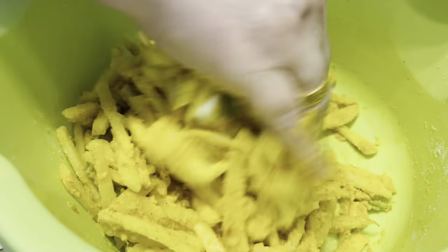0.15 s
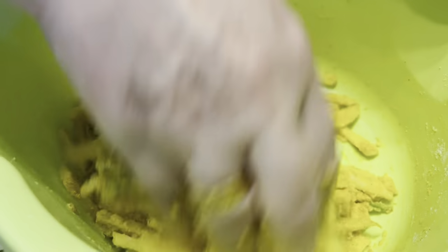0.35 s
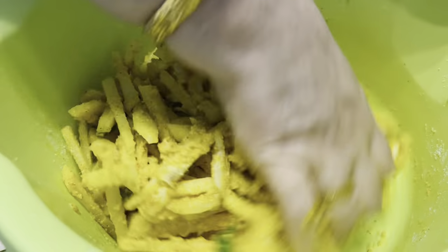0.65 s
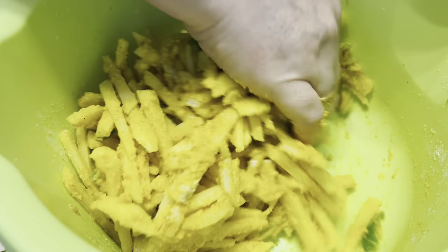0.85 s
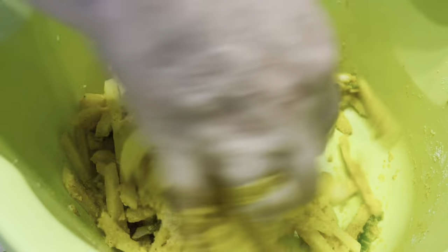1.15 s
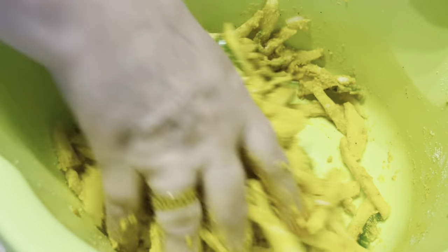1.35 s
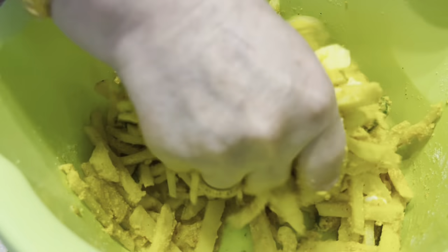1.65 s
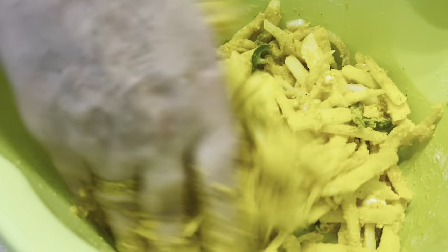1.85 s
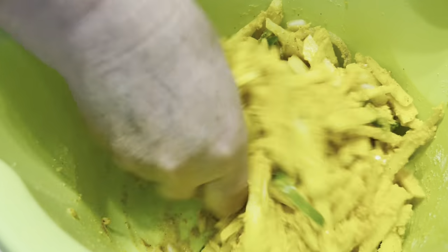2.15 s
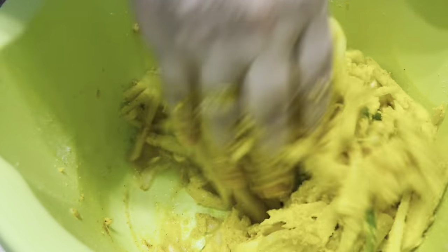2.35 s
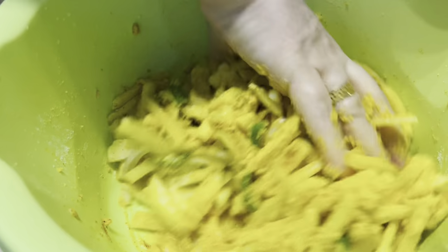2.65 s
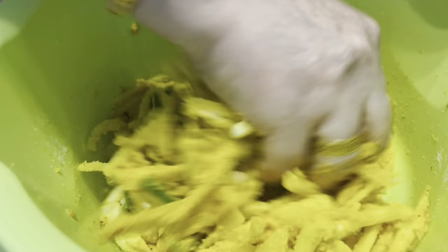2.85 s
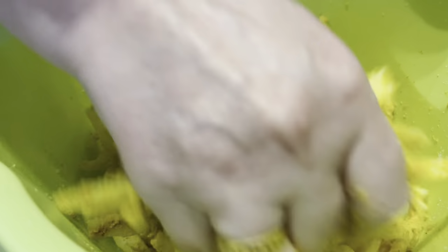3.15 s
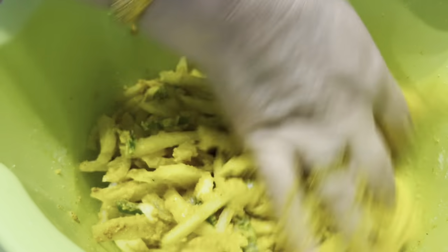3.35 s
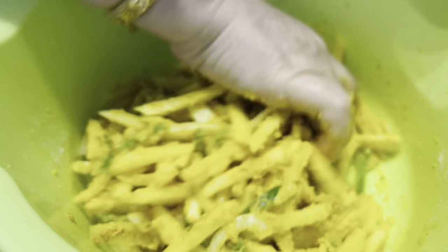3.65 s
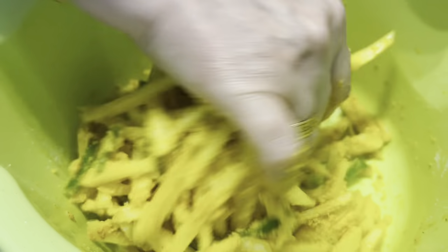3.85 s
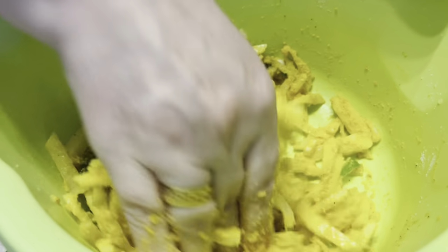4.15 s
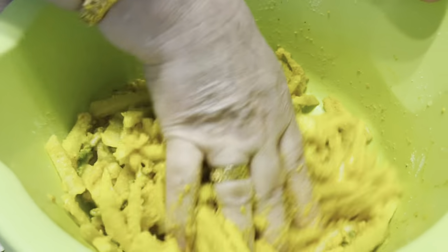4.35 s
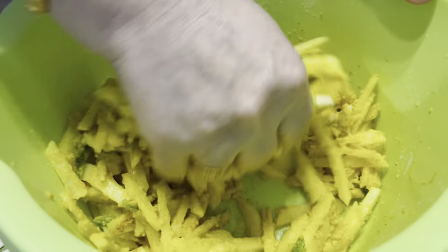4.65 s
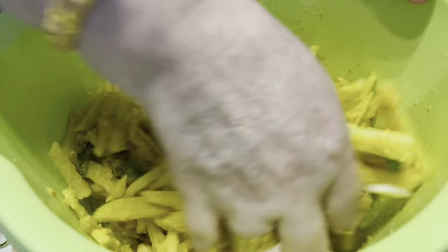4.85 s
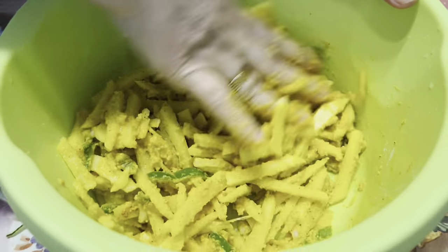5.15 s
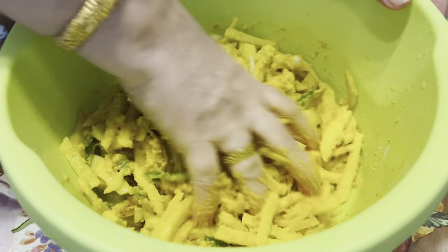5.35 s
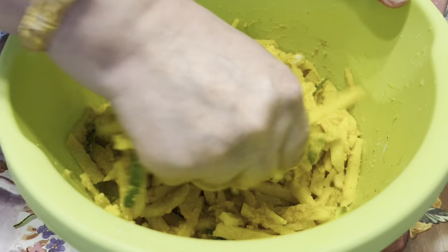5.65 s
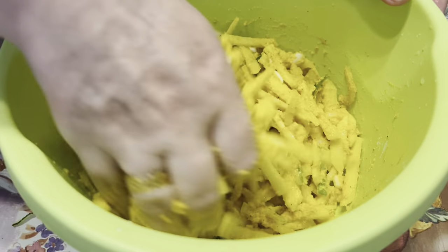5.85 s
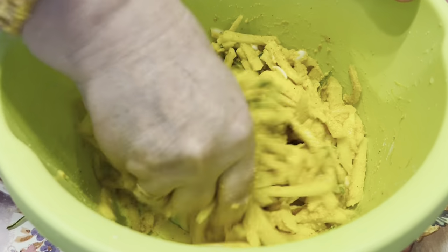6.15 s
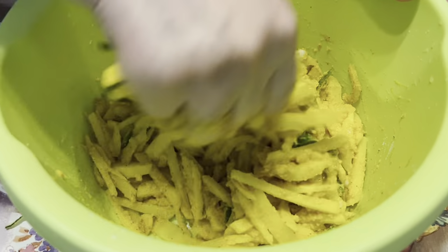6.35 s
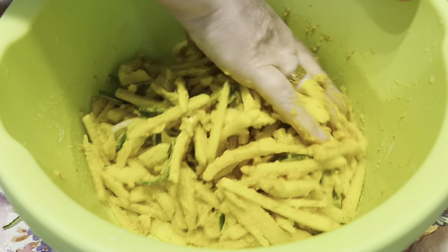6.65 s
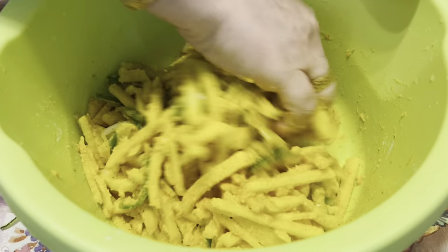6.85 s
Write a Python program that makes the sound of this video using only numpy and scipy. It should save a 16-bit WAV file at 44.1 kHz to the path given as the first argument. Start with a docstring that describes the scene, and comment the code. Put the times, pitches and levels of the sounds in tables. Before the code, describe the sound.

Close stereo sound of a hand mixing moist, coated vegetable strips in a plastic bowl. Short strokes of wet crackle, fine hiss and rubbing come in uneven bursts, while fingers and a ring knock the wall. The hardest hollow knocks fall just after two seconds, near 2.6 and near 3.6. Low table rumble and quiet kitchen air lie behind.

```python
"""A bare hand squeezes and turns damp vegetable strips in a plastic bowl, close to a stereo microphone.
Rubbing strips set the wall ringing, tearing ones crackle in dense wet grains, and a fine hiss lies on top.
Fingers and ring knock on the bowl: each knock is a set of short fading tones plus a bright crack.
Behind it, shaped noise makes the rumble and air of the kitchen, and a low sine hum swells for a while."""
import sys
import numpy as np
from scipy import signal
from scipy.fft import rfft, irfft, next_fast_len
from scipy.io import wavfile

SR = 44100
rng = np.random.default_rng(int(sys.argv[2]) if len(sys.argv) > 2 else 0)


def to_wav(s):
    """Save 16-bit WAV."""
    ch = np.atleast_2d(s).T  # columns
    pcm = np.round(np.clip(ch, -1, 1) * 32767)  # PCM
    wavfile.write(sys.argv[1], SR, pcm.astype(np.int16))


N = 308259   # length in samples, about 7 s


def from_db(db):
    """Turn decibels into a gain."""
    return 10 ** (np.asarray(db) / 20)


def rms_one(x):
    """Scale to an average strength (rms) of 1."""
    return x / np.sqrt(np.mean(x ** 2) + 1e-20)


def at_hz(points, hz):
    """Read a curve of (f/Hz, value) points, joined by straight lines over log frequency."""
    points_hz, values = np.array(points).T[:2]
    return np.interp(np.log(hz), np.log(points_hz), values)


def drift(rate_hz):
    """Slow random wandering of spread 1: noise smoothed twice at one value per 40 samples."""
    r = np.exp(-80 * np.pi * rate_hz / SR)
    noise = rng.standard_normal(N // 40 + 2002)
    slow = signal.lfilter([1], [1, -2 * r, r * r], noise)[2000:]   # drop the filter's start-up
    return np.interp(np.arange(N) / 40, np.arange(len(slow)), rms_one(slow))


def ring(clicks, hz, t60):
    """Each unit click starts a sine of height 1 that falls 60 dB in t60 seconds."""
    r, w = from_db(-60 / (t60 * SR)), 2 * np.pi * hz / SR
    return signal.lfilter([0, np.sin(w)], [1, -2 * r * np.cos(w), r * r], clicks + 1e-18)


def grains(per_s, spread_db, clump_db):
    """Two unrelated streams of clicks, a few large among many small, that come in clumps."""
    chance = per_s * from_db(clump_db * drift(25)) / SR
    born = rng.random((2, N)) < chance
    size_db = spread_db * np.minimum(rng.exponential(1, born.sum()), 5)
    out = np.zeros((2, N))
    out[born] = from_db(size_db) * rng.standard_normal(born.sum())
    return out


# how alike left and right are: (f/Hz, likeness 0-1)
ALIKE = [(60, 1), (120, 0.81), (240, 0.9), (480, 0.62), (950, 0.12), (1900, 0.52), (3800, 0.38),
         (7500, 0.84), (15000, 0.81)]


def coloured(pair, spectrum):
    """A shared and an opposed stream make left and right more or less alike, then get a spectrum."""
    size = next_fast_len(N)
    hz = np.maximum(np.fft.rfftfreq(size, 1 / SR), 1)
    curve = [(spectrum[0][0] / 2, -80)] + list(spectrum)   # fade out below the lowest point
    gain = from_db(at_hz(curve, hz)) * (hz < 1.02 * spectrum[-1][0])
    alike = np.clip(at_hz(ALIKE, hz), 0, 1)
    mid, side = rfft(pair, size) * gain
    both = np.sqrt(1 + alike) * mid + np.sqrt(1 - alike) * side * [[1], [-1]]
    return irfft(both, size)[:, :N]


def swells(rows):
    """Gestures rise, hold and fall, and add in power: one dB curve for each level column."""
    t, power = np.arange(0, N, 32) / SR, 1e-12
    for s, rise, hold, fall, *levels_db in rows:
        rising = (t - s) / max(rise, .002)
        falling = (s + hold - t) / max(fall, .08)
        shape_db = 20 * np.minimum(0, np.minimum(rising, falling))
        power = power + from_db(np.add.outer(levels_db, shape_db)) ** 2
    return np.array([np.interp(np.arange(N) / SR, t, 10 * np.log10(p)) for p in power])


def laid(s, pieces):
    """Place short stereo pieces at their times."""
    out = np.zeros((2, N + pieces.shape[2]))
    for i, piece in zip(np.round(s * SR).astype(int), pieces.transpose(1, 0, 2)):
        out[:, i:i + piece.shape[1]] += piece
    return out[:, :N]


# swells of the hum: (t at full level/s, 20 dB rise/s, at least .002, hold/s, 20 dB fall/s, at least .08,
# level/dB)
HUM_SWELLS = [(1.0, 2.5, 0.3, 2, -64), (1.45, 0.4, 0.39, -1.5, -55.5), (2.55, 0.5, 0.73, 0.5, -45.5),
              (3.25, 0, 0.19, 0, -51.5)]
HUM_HZ, HUM_SAG_HZ_PER_S = 68.2, 1.8   # starting pitch, and how fast it sinks


def hum():
    """A pure tone sinks slowly in pitch, with a slight random wobble, while its level swells and fades."""
    t = np.arange(N) / SR
    level = np.sqrt(2) * from_db(swells(HUM_SWELLS)[0])
    phase = 2 * np.pi * (HUM_HZ - HUM_SAG_HZ_PER_S * t / 2) * t + .12 * drift(1.5)
    return level * np.sin(phase)


# colours of the rumble, the deepest rumble and the still air: (f/Hz, relative level/dB per Hz)
RUMBLE_COLOUR = [(70, -5.5), (90, 5), (130, 0.5), (200, -11.5), (300, -8.5), (400, -13)]
DEEP_COLOUR = [(30, -28), (40, -9.5), (52, 7.5), (65, 8), (80, -16.5)]
AIR_COLOUR = [(120, -19), (200, 12.5), (296, -9), (405, -2.5), (1010, 8), (1270, -13), (2500, -12),
              (5230, -31), (8500, 0.5), (11000, -50), (18700, -120)]
# the bowl is shoved on the table and shakes it: (t/s, rumble level/dB, deepest rumble level/dB)
TABLE_SHOVES = [(.04, -73, -66), (.33, -59, -66), (.72, -61, -54), (.88, -71, -65), (1.42, -48.5, -47),
                (2.02, -48.5, -63.5), (2.65, -53, -65.5), (3.3, -54.5, -59.5), (3.66, -58, -51),
                (3.83, -93.5, -63), (4.17, -50, -48), (4.3, -54.5, -54), (4.44, -71.5, -54),
                (4.54, -54.5, -60), (4.87, -57.5, -51.5), (5.06, -63.5, -63.5), (5.22, -72, -49.5),
                (5.489, -57.5, -58), (5.63, -82, -57), (6.009, -60.5, -57), (6.601, -63.5, -51)]
SHOVE_RISE_S, SHOVE_HOLD_S, SHOVE_FALL_S = 0.18, 0.026, 0.14   # rise and fall are over 20 dB
RUMBLE_DB, DEEP_DB, SWAY_DB = -62, -63, 3.5   # steady levels, and the size of their random sway
AIR_DB = -67


def kitchen():
    """Low hum, swaying rumble and still air, all but the hum from noise; shoves make the table rumble."""
    low_hum = hum()
    steady = [(0, 1, N / SR, 1, RUMBLE_DB, DEEP_DB)]
    shoves = [(s, SHOVE_RISE_S, SHOVE_HOLD_S, SHOVE_FALL_S, *levels_db) for s, *levels_db in TABLE_SHOVES]
    rumble_db, deep_db = swells(steady + shoves)
    rumble, deep, air = (rms_one(coloured(rng.standard_normal((2, N)), colour))
                         for colour in (RUMBLE_COLOUR, DEEP_COLOUR, AIR_COLOUR))
    rumble = from_db(rumble_db + SWAY_DB * drift(22.0)) * rumble
    deep = from_db(deep_db + SWAY_DB * drift(6.9)) * deep
    return low_hum + rumble + deep + from_db(AIR_DB) * air


# knocks and snaps on the bowl: (t/s, base level/dB, then level/dB against it and centre f/Hz for the thud
# of the low modes, the tick of the middle modes and the snap of the top modes; crack level/dB against base
# and its pitch f/Hz, top crack level/dB against base, left over right level/dB, ring length factor,
# pitched share of the crack 0-1)
BOWL_KNOCKS = [(0.012, -33.5, -6.5, 464, -7, 790, -15, 2000, -18, 4000, -30, 0, 1, 0.6),
               (0.094, -37, -11, 298, -14, 770, -16, 2260.0, -5, 4760, -17, 7, 0.69, 0.6),
               (0.3017, -32, -9, 510, -32, 754.0, -35.0, 1890.0, -38, 5090.0, -19, 2, 0.9, 0.65),
               (0.333, -34, -7, 305, -16.5, 1050, -21, 1880.0, -34.5, 6630.0, -28.0, -3.5, 1.05, 0.65),
               (0.3618, -27, -14.5, 365, -14, 1110, -3, 2530, -11, 3260, -19, 4, 1.1, 0.65),
               (0.5151, -32, -19, 550.0, -14.5, 1250, -11, 2200.0, -10, 4330.0, -13, 5, 0.75, 0.65),
               (0.853, -36, -8, 500.0, -27, 805.0, -20, 2440.0, -21.0, 3310.0, -14, 3, 0.73, 0.65),
               (0.9602, -29.5, -43, 320, -37, 870, -8.5, 2400, -10.5, 4310.0, -17, -1, 1, 0.4),
               (1.105, -38, -9, 458, -44, 740, -27, 2070, -21.5, 8100, -36, 6, 1, 0.65),
               (1.133, -43, -6, 510.0, -39, 864.0, -23.0, 2470.0, -23.5, 7990.0, -34.0, 5, 1.2, 0.65),
               (1.199, -40.5, -10, 300.0, -9.5, 1010, -5.5, 2150, -26.0, 3310.0, -24.0, 5, 1.1, 0.65),
               (1.22, -38, -24, 610, -22, 1050, -1.5, 2480, 1, 4250, -5.5, 5, 0.72, 0.4),
               (1.3928, -30.5, -17, 610.0, -11.5, 940, -19, 2450.0, -4.5, 7560, -27.5, 4, 1.3, 0.7),
               (1.507, -35.5, -6, 516, -23, 1420, -25, 2380.0, -5, 3500, -9, 3, 1, 0.6),
               (1.7274, -32.5, -13.5, 480.0, -17, 770, -8, 1980, -12, 4030, -15, 4, 0.95, 0.3),
               (1.808, -43.5, -14, 300.0, -17, 982.0, -2, 3270.0, -12, 4410.0, -28.0, -1.5, 0.9, 0.65),
               (1.824, -34.5, -29, 620.0, -16, 1140, -7, 1760, -12, 3490.0, -26.5, 4, 1, 0.65),
               (1.876, -45, -2, 520.0, -32.5, 999.0, -28, 1810.0, -30, 5460.0, -30, 1, 1.1, 0.65),
               (1.892, -43, -4, 560.0, -29, 910.0, -18, 3140.0, -23.0, 3500.0, -9, 6.0, 0.72, 0.65),
               (1.9065, -26.5, -14, 600.0, -15.5, 990, -6, 2820, -6, 3500, -27, 4.5, 1.2, 0.7),
               (2.0149, -12, -22, 650.0, -13.5, 840, -8, 2175, -5, 4590, -9, 6, 0.95, 0.5),
               (2.1081, -23.5, -11, 540.0, -12.5, 990, -25, 2530.0, -27.5, 4390.0, -32, -0.5, 0.77, 0.65),
               (2.117, -23, -11, 550.0, -6.5, 960, -16, 2510.0, -15, 3340, -22, -12, 1, 0.9),
               (2.1258, -16, -12, 560.0, -7, 920, -5.5, 2665, -9.5, 4400, -13, 6.5, 0.93, 0.54),
               (2.134, -26.5, -10.5, 560, -6, 930, -20, 2500, -30, 4000, -40, 1, 1.1, 0.6),
               (2.3014, -32, -9, 470, -46, 937.0, -36, 2440.0, -42.0, 3780.0, -48.0, 8, 0.91, 0.65),
               (2.323, -36.5, -13, 517, -20, 1120.0, -5.5, 2290, -11.5, 3570, -41, 0, 1.2, 0.8),
               (2.382, -41, -9, 383, -28, 810.0, -12, 1860, -24, 5010.0, -31, 0.0, 1, 0.65),
               (2.397, -34, -9.5, 517, -44, 818.0, -13, 2370, -19.5, 7910.0, -39.0, 4, 0.86, 0.65),
               (2.419, -40.5, -1, 440.0, -12.5, 1090.0, -8, 2036, -34.0, 7760.0, -36.0, -1.5, 1.1, 0.65),
               (2.449, -32, -11.5, 560.0, -10.5, 1080, -16, 1970.0, -38.5, 3530.0, -43, 6.5, 1.2, 0.65),
               (2.458, -31, -9.5, 580.0, -6, 931.0, 0, 2500.0, -3.5, 5020, -34.0, 1.5, 1, 0.6),
               (2.4652, -22, -10, 408, -8.5, 1780, -12.5, 1800, -27, 3310.0, -44.5, 1.5, 1, 0.65),
               (2.4736, -20, -10.5, 457, -23.5, 1050.0, -43.5, 1810.0, -46, 3410.0, -47, 4.5, 1.5, 0.65),
               (2.483, -24.5, -9, 510.0, -13, 1070, -10, 2010.0, -36.5, 3660.0, -42, -6, 0.91, 0.65),
               (2.6497, -13, -15.5, 500, -7.5, 890, -8, 1310, -23, 3450.0, -23, 1, 0.99, 0.5),
               (2.684, -17.5, -9.5, 510.0, -11, 940, -11.5, 1790, -34, 3980.0, -40, 0.5, 1.45, 0.65),
               (2.705, -30.5, -19, 600, -7, 905, -18, 2000, -30, 4000, -40, 2, 0.9, 0.65),
               (2.7263, -24.5, -12.5, 480.0, -22, 802.0, -15, 2260.0, -24.5, 4190.0, -35.0, 4, 1, 0.65),
               (2.939, -52, -14.0, 294, -23, 876, -17, 3270.0, 7.5, 3310.0, -25.5, -9, 0.73, 0.75),
               (2.985, -47.5, -7.5, 300.0, -22, 750.0, -3.0, 3000, 3.5, 3820, -6, 0, 0.9, 0.65),
               (3.0839, -31, -20.5, 545, -11, 1100.0, -13, 1940.0, -15, 3630, -23, 6, 1.4, 0.9),
               (3.1661, -23, -13.5, 290, -14, 1650, -9.5, 2660, -18, 3860, -31, 4, 0.93, 0.8),
               (3.175, -34, -26, 500, -11, 1580, -8, 2300, -16, 3300, -41, 3, 1.3, 0.65),
               (3.182, -32, -6.5, 338, -19, 990, -16, 2190.0, -33, 3590.0, -29, 6, 0.8, 0.65),
               (3.2017, -28, -21, 450.0, -28, 1720.0, -6, 2520, -7.5, 3450, -21.0, 2, 1.1, 0.54),
               (3.234, -41, -30, 520.0, -8, 1000.0, -11, 1810.0, -22, 3460.0, -28, -4.5, 1, 0.6),
               (3.2842, -30.5, -29, 300.0, -12.5, 1120, -22, 2510.0, -10, 3750.0, -11, -0.5, 1.3, 0.65),
               (3.372, -19.5, -11, 497, -10.5, 1450.0, -26, 2170.0, -30.5, 7900, -17, 4.5, 1.16, 0.65),
               (3.4023, -28, -15, 650.0, -14.5, 835, -12, 2380, -24, 4130, -25.5, 9, 0.86, 0.65),
               (3.553, -16, -16, 520.0, -11, 800, -30, 1783, -13, 6240, -35, -1, 1.1, 0.4),
               (3.6218, -13.5, -9, 560, -5.5, 1190, -8, 2800, -9.5, 4500.0, -11.5, 1.5, 0.69, 0.46),
               (3.98, -40, -8.5, 480.0, -29, 1160.0, -23, 2800.0, -22, 3350.0, -17, 0.5, 0.9, 0.65),
               (3.99, -40, -7, 500.0, -9.5, 1640.0, -23, 2050.0, -24, 4910.0, -30, 3, 1.1, 0.65),
               (4.0069, -28, -13, 540.0, -20, 1070, -10.5, 2350, -13.5, 3890.0, -18, 2, 1.3, 0.4),
               (4.029, -28.5, -13, 527, -16, 1120, -5.5, 1780, -40, 4010.0, -39.0, 5, 1.3, 0.65),
               (4.172, -35, -16.5, 510.0, -14, 1040, -16, 2830.0, -9, 3870.0, -19, 4, 1.1, 0.65),
               (4.437, -24.5, -11.5, 520, -12, 1060, -17, 3000, -16.5, 3320, -39, 1, 1.6, 0.65),
               (4.4423, -16, -22.5, 530.0, -11, 1760, -11.5, 1810.0, -5, 3300, -31.0, -0.5, 1.5, 0.3),
               (4.4577, -29.5, -8, 570.0, -18, 1500.0, -14, 1960.0, -16, 7850.0, -16, 3, 1, 0.65),
               (4.548, -34, -13.5, 572, -32, 888.0, 0, 2180, -6, 7900.0, -12, 2.5, 1.3, 0.65),
               (4.688, -57.5, -22.5, 510.0, -28, 1030.0, -10.5, 2550.0, 21, 4520, -7.0, 0, 0.9, 0.65),
               (4.743, -42, -24, 337, -26, 1570.0, 1, 2340, -6, 7000, -29.5, 2, 1.3, 0.5),
               (4.7642, -36, -11.5, 546, -25, 744, -7, 2070.0, -10, 6000, -13.5, 2.5, 1.3, 0.5),
               (4.8056, -20.5, -20, 484, -6.5, 1450, -19, 1850, -21, 3280, -28, 4, 1.25, 0.8),
               (4.845, -34.5, -8.5, 537, -13, 1570.0, -35, 1810.0, -31, 3530.0, -21, 5.5, 1.3, 0.65),
               (4.8992, -26.5, -5, 437, -39, 864.0, -35, 3100.0, -31, 3310.0, -38, -1, 1.3, 0.65),
               (4.967, -34.5, -7.5, 310.0, -14, 1710.0, -11, 2030.0, -4, 4390.0, -30, 4, 0.55, 0.6),
               (4.9868, -20, -9, 506, -21, 930, -14, 1900, -16, 4730, -25, 5, 1.07, 0.6),
               (5.048, -35, -13, 470.0, -7, 1610, -19, 2300.0, -2, 5560, -13, 2.5, 1.2, 0.5),
               (5.283, -22.5, -7.5, 554, -28, 980, -26.5, 2130.0, -26.5, 3310.0, -32, -2.5, 0.4, 0.6),
               (5.3119, -24, -9, 527, -11, 950, -29, 1880, -27, 3780.0, -37, -5, 0.81, 0.65),
               (5.3563, -27.5, -27, 590.0, -14, 975, -9, 1810.0, -7.5, 3860, -11, 0.0, 0.77, 0.4),
               (5.373, -33.5, -15, 590.0, -11, 939.0, -15, 2450.0, 1, 3820.0, -21.0, 0.5, 0.9, 0.65),
               (5.422, -36.5, -6.5, 520.0, -15.0, 888.0, -25, 2630.0, -28.0, 7560.0, -21, -2, 0.86, 0.65),
               (5.4845, -32.5, -14.5, 530.0, -15, 1610, -11, 2090.0, -4.5, 3280, -13, 2, 1, 0.5),
               (5.606, -50, -23, 300.0, -30, 760, -14, 2670.0, 10, 8100, -20, -2, 0.76, 0.3),
               (5.669, -55, -15, 300.0, -14, 861.0, -10, 2960.0, 11.5, 7650, 7.5, 13, 0.9, 0.9),
               (5.683, -50, -24, 500, -21, 900, -10, 3000, 11.5, 4300, -11, 3, 0.75, 0.6),
               (5.691, -52, -24, 650.0, -14.5, 1020, -15.0, 3010.0, 13.5, 7560, 8.5, 5.0, 0.83, 0.65),
               (5.746, -35.5, -39, 380.0, -36.0, 1760.0, -3, 2730, -16, 3560, -27.0, 6, 1.1, 0.7),
               (5.774, -47, -28, 500, -26, 1700, -3, 2210, 2, 3500, -20, 1, 0.9, 0.65),
               (5.783, -46, -28, 500, -24, 1710, -3, 2600, -8, 3500, -20, 7, 1, 0.65),
               (5.796, -49, -4.5, 480.0, -20, 740.0, -7, 3000.0, -8, 3700.0, -20, 4, 0.9, 0.65),
               (5.8241, -30.5, -22.5, 540.0, -11.5, 1060, -6, 2080, -36.0, 3320.0, -38, 6, 1.1, 0.65),
               (5.892, -44.5, -12, 300.0, -11, 1010, 1, 3000, -21.0, 3310.0, -29, 2, 0.96, 0.65),
               (5.927, -41.5, -15, 450.0, -7, 1120, -13, 2060.0, 1, 3450, -24.0, -1, 1.1, 0.65),
               (6.436, -51, -23, 292, -12, 830, -22, 3070.0, 4.5, 7900, 8, 0, 0.9, 0.8),
               (6.5213, -24.5, -25, 650.0, -17, 1450, -7.5, 2240, -22, 3310.0, -27, -6, 1.6, 0.6),
               (6.5298, -30, -11, 460.0, -7.5, 1580.0, -20, 2280.0, -15, 3630, -34.0, 6, 1.2, 0.65),
               (6.5406, -25, -5.5, 440.0, -21, 1590.0, -29, 2470.0, -25, 3930.0, -33, 4, 0.5, 0.65),
               (6.5715, -26.5, -13, 500.0, -6.5, 1540, -11, 2190.0, -20, 7470.0, -22, 3, 1.4, 0.65),
               (6.6448, -30.5, -24, 540.0, -8, 1000.0, -30, 2540.0, -28.0, 3570, -36.0, 5, 1.3, 0.65),
               (6.6614, -30.5, -17, 550.0, -9, 970.0, -31.0, 2010.0, -14, 3500, -30, 2, 1, 0.65),
               (6.727, -28, -31, 550.0, -14, 1780.0, -8, 1840, 0, 4300.0, -28.0, -6, 0.84, 0.5),
               (6.733, -26, -20, 480.0, -9, 1770, -19, 2910.0, -7, 3620, -34.0, -1, 1, 0.3),
               (6.78, -38, -21, 580.0, -6.5, 996.0, -15, 1990.0, -22.0, 5700, -22.0, 0, 1.3, 0.65),
               (6.8208, -34.5, -27, 590, -8.5, 930, -7, 1810.0, -14, 3450.0, -23, 3, 1.1, 0.65),
               (6.859, -40.5, -13, 433, -14, 923, -17, 2310.0, 3, 6400, 5, -1, 0.9, 0.65),
               (6.937, -43.5, -11, 530.0, -37, 940, -28, 2220.0, 2, 8400, -31.0, 4, 0.86, 0.74)]
# modes, the tones the bowl wall can ring at: (f/Hz, relative level/dB,
# base time to fall 60 dB t/s, which knocks and squeezes each scale)
BOWL_MODES = [(136, 15, 0.051), (237, 5.5, 0.028), (326, -2, 0.016), (450, -4, 0.077), (531, 4.5, 0.053),
              (688, -2, 0.043), (858, -5, 0.046), (931, 1.5, 0.044), (1015, 0.5, 0.083),
              (1310, -0.5, 0.0089), (1562, 1.5, 0.025), (1700, -6.5, 0.084), (2110, 0, 0.028),
              (2596, -3.5, 0.041), (3040, -0.5, 0.019)]
# colours of the crack and the top crack: (f/Hz, relative level/dB per Hz)
CRACK_COLOUR = [(2500, 14.5), (4500, 11), (7000, 12), (10000, 6.5)]
TOP_CRACK_COLOUR = [(10000, 4.5), (12000, 8), (13500, 2.5), (14600, 7), (15600, 3.5), (16500, -13)]
THUD_FALL_DB, TICK_FALL_DB, SNAP_FALL_DB = 26, 31.5, 57   # loss one octave from each centre
PUSH_S, PUSH_TURNS = .0016, -.2   # time for the push to build up; its phase in turns
CONTACT_CYCLES = 0.93   # a padded contact lets each mode swell over about this many cycles
SPREAD_S = 0.001198   # low bending waves are slower: lag at 1 kHz, growing with the root of the period
GRIP_CYCLES, TAIL_DB = 2.48, -8   # the hand chokes a ring in a few cycles (times its length factor); tail
CRACK_RISE_MS, CRACK_FALL_MS, TOP_FALL_MS = 0.76, 2.3, 3.7
WALL_LOW_CUT_HZ = 86


def knocks():
    """A knock swells each wall mode, low ones later; the hand damps them, and a brief bright crack joins."""
    (s, peak_db, thud_db, thud_hz, tick_db, tick_hz, snap_db, snap_hz,
     crack_db, crack_hz, top_db, pan_db, free, pitched) = np.transpose(BOWL_KNOCKS)
    sides = from_db(np.outer([.5, -.5], pan_db))
    modes = len(BOWL_MODES)
    chance = rng.normal(0, 1, (len(s), 3 * modes + 1))
    t = np.arange(1800) / SR
    rings = np.zeros((2, len(s), len(t)))
    bands = ((thud_db, THUD_FALL_DB, thud_hz), (tick_db, TICK_FALL_DB, tick_hz), (snap_db, SNAP_FALL_DB, snap_hz))
    for k, (hz, db, t60) in enumerate(BOWL_MODES):
        colour = sum(from_db(level_db - fall_db * np.log2(hz / centre_hz) ** 2)
                     for level_db, fall_db, centre_hz in bands)
        age = t - PUSH_S - SPREAD_S * np.sqrt(1000 / hz)   # time since this mode's full push
        before, after = np.minimum(age, 0), np.maximum(age, 0)
        swell = np.exp(-(before * hz / CONTACT_CYCLES) ** 2) * np.minimum(t / PUSH_S, 1)
        choked = np.exp(-(after * hz / (GRIP_CYCLES * free[:, None])) ** 2)
        loss = np.log(1000) / (1.48 * t60 * np.clip(free, .2, 3)[:, None])
        shape = swell * (choked + from_db(TAIL_DB) * np.exp(-loss * after))
        # the load of strips shifts each mode
        loaded_hz = hz * (1 + 0.047 * chance[:, [k + 2 * modes]])
        # each microphone faces another part of the wall and hears the mode at its own strength
        own_db = 1.5 * chance[:, k] + 1.5 * chance[:, k + modes] * [[1], [-1]]
        gain = sides * colour * from_db(peak_db + db - 3.5 + own_db)
        # the modes are nearly in step at the push
        rings += gain[:, :, None] * shape * np.cos(2 * np.pi * (loaded_hz * age - PUSH_TURNS))
    ms = 1000 * t
    crack, top = (from_db(peak_db + db)[:, None] * (1 - np.exp(-ms / CRACK_RISE_MS)) * np.exp(-ms / fall_ms)
                  * sides[:, :, None] for db, fall_ms in ((crack_db, CRACK_FALL_MS), (top_db, TOP_FALL_MS)))
    share = np.clip(pitched, 0, 1)[:, None]
    turns = crack_hz[:, None] * t + chance[:, -1:]
    whistle = np.sqrt(2) * share * crack * np.sin(2 * np.pi * turns)
    out = laid(s, rings + whistle)
    # a small wall radiates no bass
    out = signal.sosfilt(signal.butter(2, WALL_LOW_CUT_HZ, "high", fs=SR, output="sos"), out)
    noisy_crack = np.sqrt(1 - share ** 2) * crack
    for shape, spectrum in ((noisy_crack, CRACK_COLOUR), (top, TOP_CRACK_COLOUR)):
        out += laid(s, shape) * rms_one(coloured(rng.standard_normal((2, N)), spectrum))
    return out


def fizz(pair, cycles, spectrum):
    """Each wet grain rings for a few cycles at one of 14 pitches dealt to it by chance."""
    dealt = rng.integers(0, 14, (2, N))
    pitches = np.geomspace(spectrum[0][0], spectrum[-1][0], 14)
    rings = sum(ring(pair * (dealt == k), hz, cycles / hz) * hz ** .5 for k, hz in enumerate(pitches))
    return rms_one(coloured(rings, spectrum))


# squeezes and turns of the hand: (t at full force/s, 20 dB rise/s, at least .002, hold/s,
# 20 dB fall/s, at least .08, wall ringing level/dB, wet crackle level/dB, fine hiss level/dB)
HAND_STROKES = [(0.0, .05, 0.0014, 0.14, -38, -44.5, -46.5), (0.3, 1, 0.03, 8, -67, -71.5, -66),
                (0.37, 0.03, 0.09, 1.7, -52.5, -49, -55.5), (0.54, 0.43, 0.0085, 1.6, -65, -72, -51.5),
                (0.70, 0.1752, 0.043, -0.01, -43, -40.5, -43), (0.79, 0.3, 0.034, 0.06, -42.5, -47, -52.5),
                (1.2, -0.8, 0.098, 0.4, -52.5, -59.5, -92), (1.40, 0.05, 0.091, 0.13, -43, -45.5, -48.5),
                (1.55, -0.15, 0.0024, 0.3, -94, -83, -57), (1.84, -0.5, 0.017, 0, -53, -73, -69),
                (1.91, 0, 0.061, -0.9, -52.5, -53, -52), (2.03, 0.09, 0.0066, -0.08, -39.5, -45, -41.5),
                (2.11, 0.13, 0.031, 0.14, -40.5, -46, -51), (2.17, -0.8, 0.0052, 0.5, -52.5, -69.5, -82),
                (2.46, -0.06, 0.19, -0.48, -45.5, -49.5, -50.5), (2.64, 0.04, 0.042, 0.33, -41, -41.5, -45),
                (3.05, 0, 0.03, -1.7, -79, -64, -62.5), (3.175, -3.1, 0.036, 4, -62, -63.5, -78.5),
                (3.24, 0.04, 0.073, 0.2, -51, -46.5, -53), (3.40, 0.22, 0.04, 0.2, -48, -43.5, -41),
                (3.60, 0.2, 0.06, 0.16, -39.5, -44.5, -50), (3.72, 0.23, 0.079, 0, -57, -56, -53.5),
                (3.88, -5, 0.036, 3, -69, -79.5, -65.5), (4.012, -0.6, 0.011, 1.7, -52.5, -52.5, -58),
                (4.17, -0.18, 0.18, 0.8, -51, -52, -56), (4.42, 0.12, 0.057, 0, -45, -41.5, -43.5),
                (4.67, 0.7, 0.077, -2.5, -84, -80, -55.5), (4.94, 0.16, 0.077, 0.48, -47.5, -46.5, -49.5),
                (5.07, -0.4, 0.0087, 0.6, -59, -53.5, -57), (5.27, -0.02, 0.033, 0.21, -43, -50, -53),
                (5.38, 0.2, 0.051, -0.3, -45.5, -50, -53), (5.53, 0.5, 0.0065, 0, -56.5, -52, -51),
                (5.72, 0.5, 0.063, -4.8, -84, -68, -60), (5.98, 0.2, 0.074, 0.28, -50.5, -50, -52),
                (6.13, -0.05, 0.035, 0.2, -55.5, -56, -49.5), (6.535, -0.24, .03, 0.5, -44.5, -47.5, -47.5),
                (6.6, -0.28, 0.11, 0.13, -45, -52, -52), (6.73, -0.02, 0.013, 0.07, -55.5, -37.5, -48),
                (6.82, -0.42, 0.038, -0.46, -47.5, -54.5, -54)]
# while the hand is still: (wall ringing level/dB, wet crackle level/dB, fine hiss level/dB)
STILL_HAND = [-99.5, -89.5, -75.5]


def hand():
    """Levels of wall, crackle and hiss: the force of each stroke over a faint rest."""
    return swells(HAND_STROKES + [(0, 1, N / SR, 1, *STILL_HAND)])


# colours of the wet crackle and the fine hiss: (f/Hz, relative level/dB per Hz)
CRACKLE_COLOUR = [(700, -20), (1300, -11.5), (1900, -9.5), (2500, -8), (3500, -10.5), (4600, -15),
                  (5500, -27.5)]
HISS_COLOUR = [(3500, -2), (5000, -3), (7000, -2.5), (9000, -1), (10500, -5), (12500, -3), (14500, -9.5),
               (15600, 4)]
TICKS_PER_S, TICKS_DB = 150, 8.5   # single strips that stick and let go; size against the fine grains
HISS_TOP_HZ = 15800


def squeezing():
    """Strips dragged along the wall excite its modes; tearing fibres crackle; finer grains hiss."""
    wall_db, crackle_db, hiss_db = hand()
    wall = 0
    for hz, db, t60 in BOWL_MODES[1:14]:   # all but the lowest and highest, each caught by other strips
        mid, side = from_db(db) * ring(grains(300, 2.15, 3.2), hz, 0.57 * t60)
        wall = wall + mid + from_db(-9.0) * side * [[1], [-1]]
    fine = grains(5000, 1.05, 2.6)
    ticks = from_db(TICKS_DB) * grains(TICKS_PER_S, 1.4, 4.0)
    crackle = fizz(fine + ticks, 20.5, CRACKLE_COLOUR)
    hiss = fizz(grains(16000, 0.93, 1.9), 13.0, HISS_COLOUR)
    hiss = signal.sosfilt(signal.cheby2(10, 30, HISS_TOP_HZ, fs=SR, output="sos"), hiss)
    layers = from_db(wall_db) * rms_one(wall) + from_db(crackle_db) * crackle + from_db(hiss_db) * hiss
    return from_db(np.array([[.8], [-.8]])) * layers   # the hand works a little left of centre


def scene():
    """Hand, bowl and kitchen together."""
    return squeezing() + knocks() + kitchen()


RIGHT_LAG_S = .00002
SHARED_TREBLE_HZ, IN_STEP_HZ, TREBLE_LEAD_S = 9300, 8420, .000278   # fully shared from; lead starts at
MIC_LOW_CUT_HZ, CUTOFF_HZ = 29, 16800


def record(dry):
    """The right side hears a touch later; the top treble is shared, earlier on the right; ends are cut."""
    left, right = rfft(dry)
    hz = np.fft.rfftfreq(N, 1 / SR)
    shared = np.clip((hz - SHARED_TREBLE_HZ) / 1200 + 1, 0, 1)
    early = left * np.exp(2j * np.pi * np.maximum(hz - IN_STEP_HZ, 0) * TREBLE_LEAD_S)
    late = right * np.exp(-2j * np.pi * hz * RIGHT_LAG_S)
    heard_right = np.sqrt(1 - shared ** 2) * late + shared * early
    out = irfft(np.array([left, heard_right]), N)
    out = signal.sosfilt(signal.butter(2, MIC_LOW_CUT_HZ, "high", fs=SR, output="sos"), out)
    return signal.sosfilt(signal.cheby2(16, 70, CUTOFF_HZ, fs=SR, output="sos"), out)


dry = scene()
out = record(dry)
to_wav(out)
```